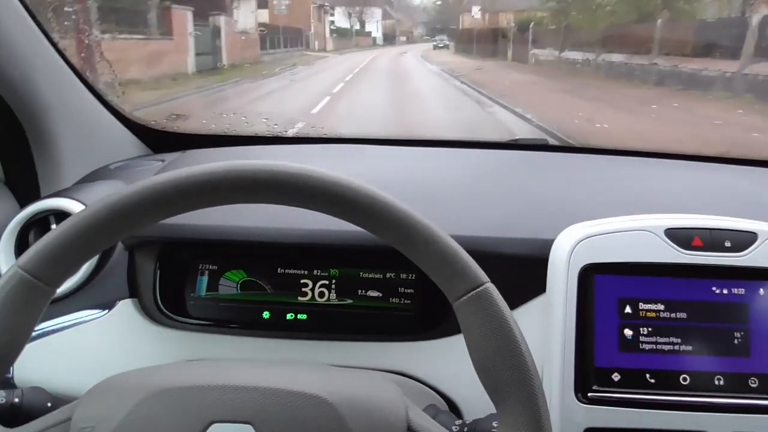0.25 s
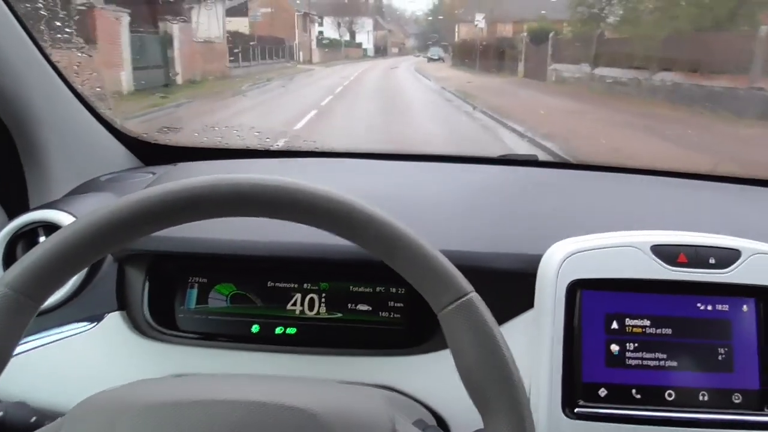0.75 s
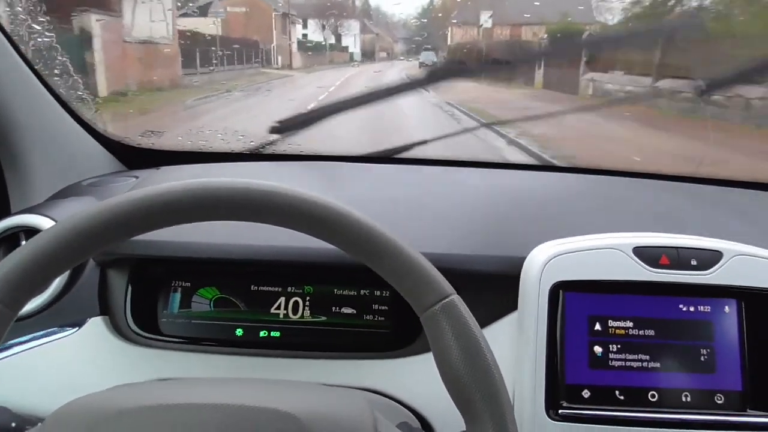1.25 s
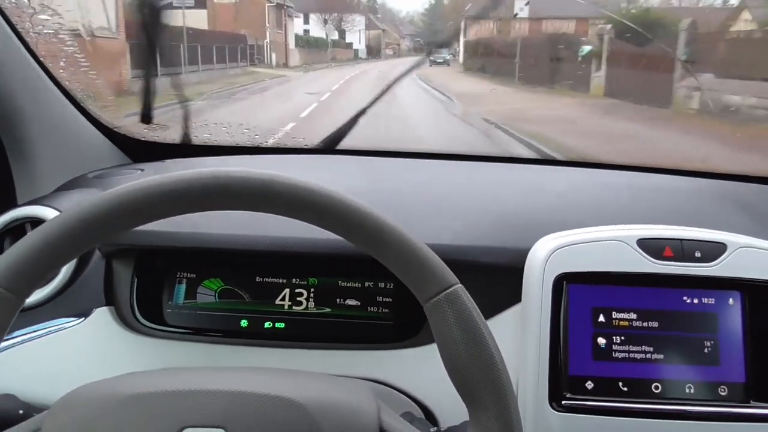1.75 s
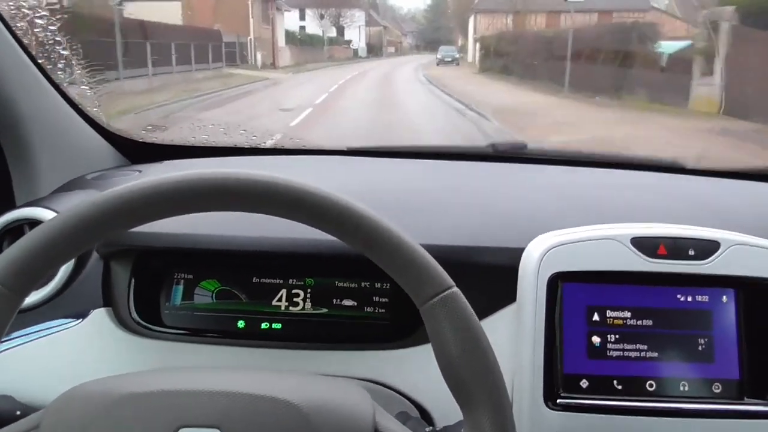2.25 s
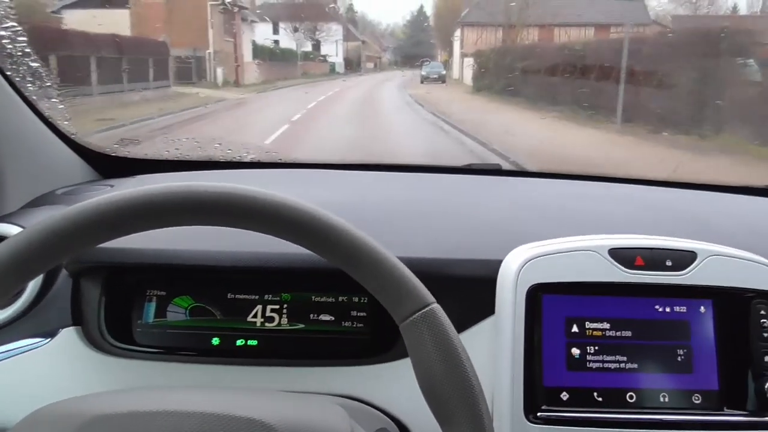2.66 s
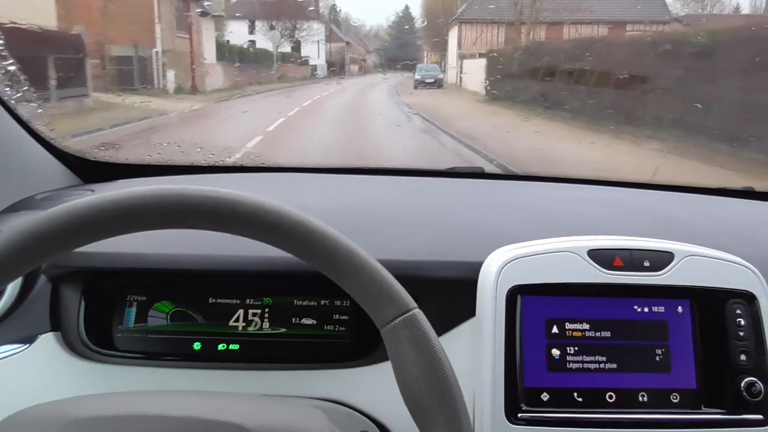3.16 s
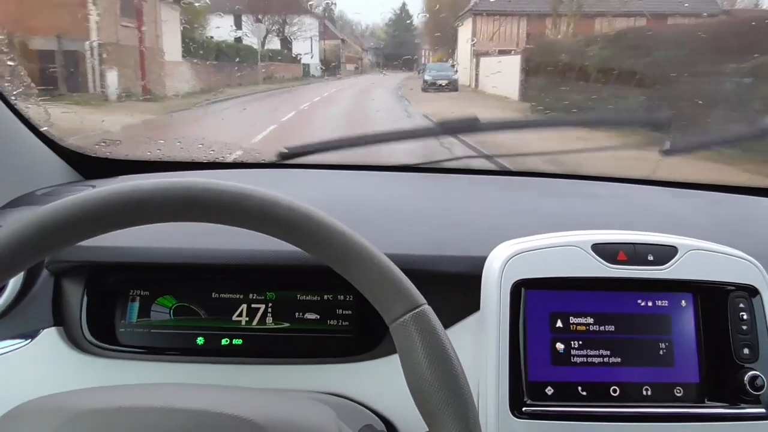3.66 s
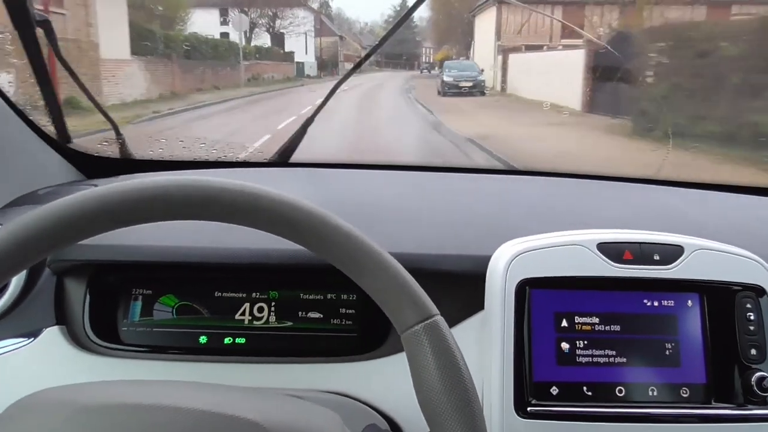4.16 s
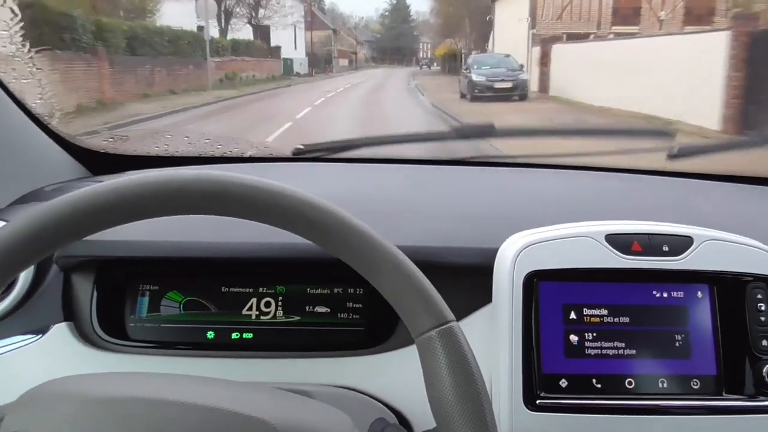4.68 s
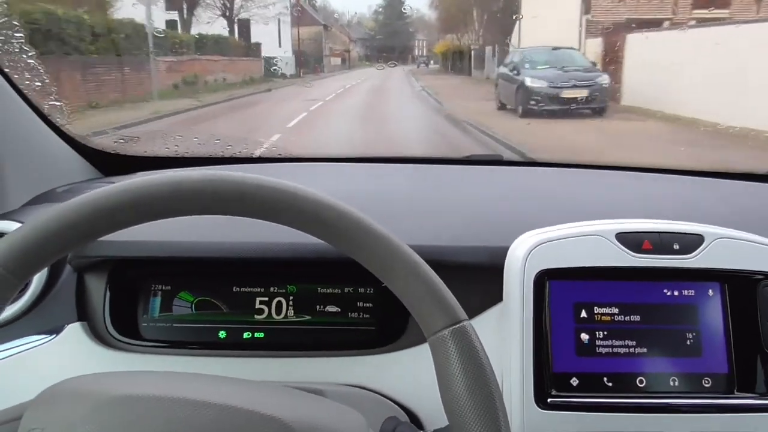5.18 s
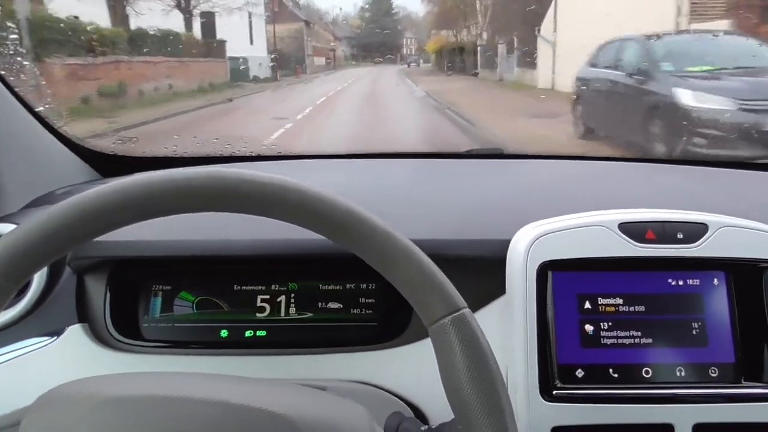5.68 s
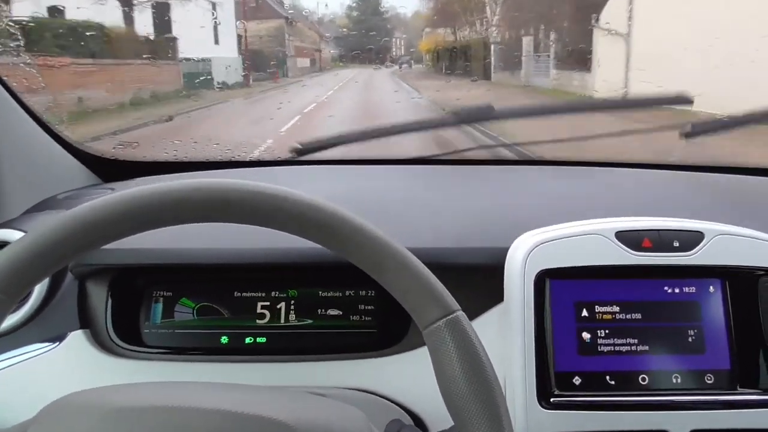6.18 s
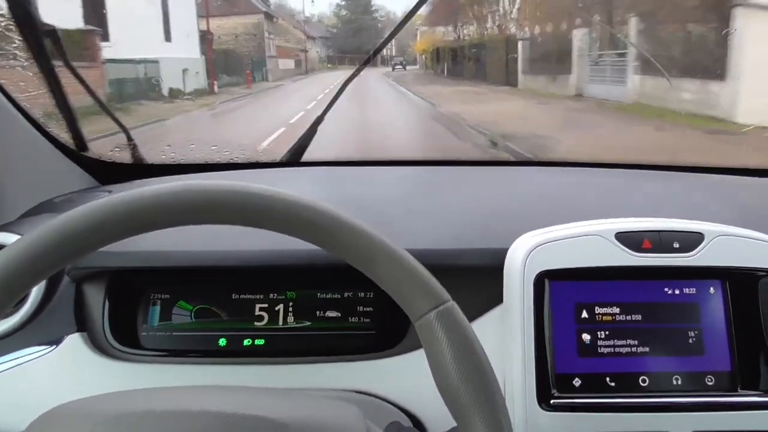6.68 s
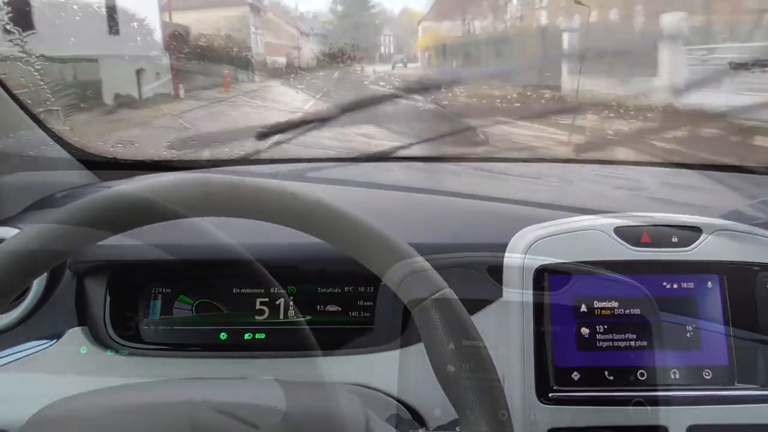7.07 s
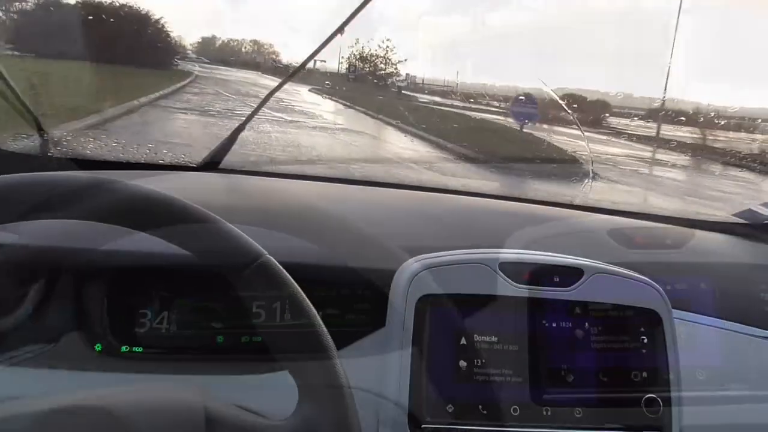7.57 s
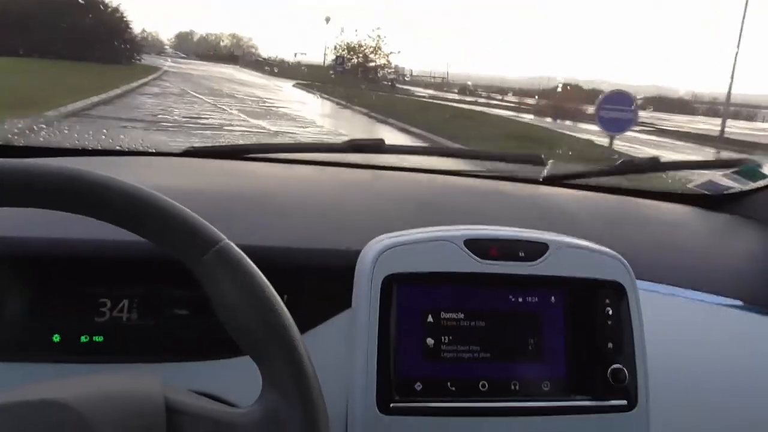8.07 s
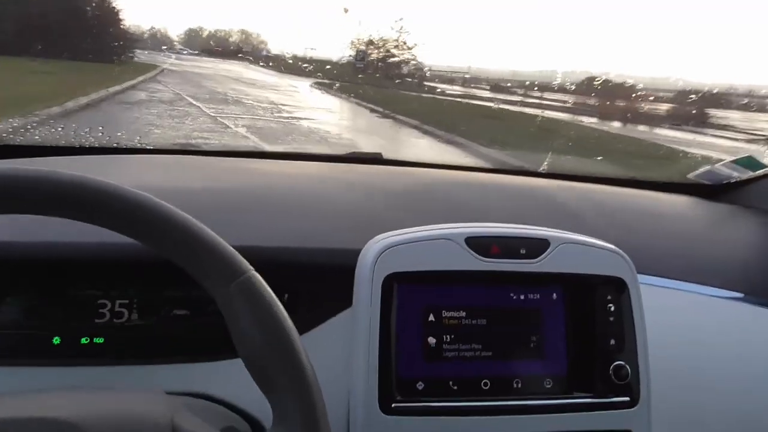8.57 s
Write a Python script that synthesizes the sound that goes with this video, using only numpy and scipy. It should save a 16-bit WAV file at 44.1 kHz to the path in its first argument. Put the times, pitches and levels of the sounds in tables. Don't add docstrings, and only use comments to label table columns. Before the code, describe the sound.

Inside a quiet car driving in rain, microphone by the driver's seat. A steady deep rumble, low boom and muffled tread roar waver with the asphalt, beneath a grainy hiss of spray, ticking drops and faint wind at the seals. It starts fairly smooth and grows wetter from about 1.6 s, with short splats on arches and glass. Wiper arms knock dully near 1.1, 1.8, 3.6 and 4.3 s, then hardest at 6.1 s, with softer rattles around 6.8 s. Rubber chirps are barely audible near 1.7, 4.2, 5.0 and 6.7 s. A strong boom hits at 7.25 s as a slower, rougher road fades in; a tiny high squeak follows at 7.47 s. Heavy booms and coarse tyre growls come at 7.7, 7.9 to 8.1, 8.35 and 8.7 s, with soft wiper knocks at 7.8 and 8.7 s, spray continuing to the end near 8.8 s.

```python
import sys
import numpy as np
from scipy import signal
from scipy.fft import rfft, irfft, next_fast_len
from scipy.io import wavfile
from scipy.ndimage import uniform_filter1d

SR = 44100
rng = np.random.default_rng(int(sys.argv[2]) if len(sys.argv) > 2 else 0)


def boost_factor(decibels):
    exponent = np.asarray(decibels, float) / 20
    return 10 ** exponent


def persist_wave(psi):
    counts = np.round(np.clip(psi, -1, 1) * 32767).astype(np.int16)
    wavfile.write(sys.argv[1], SR, np.atleast_2d(counts).T)


N = 389403


def rolling():
    # f/Hz, density/dB per Hz
    cabin = [(12, -51), (20, -18), (86, -11), (117, -5.5), (135, -8), (253, -9.5), (375, -6), (405, -15),
             (439, -15), (484, -17.5), (589, -26), (823, -30), (1220, -30.5), (1740, -49), (2200, -51),
             (2860, -54), (4840, -120)]
    # f/Hz, width/Hz, lift/dB
    panels = [(136.3, 28, 17), (170, 11.7, 10.5), (224.5, 2.8, 1), (362, 80, -6), (433, 10, 0.5),
              (702, 24, 4), (810, 59, 5), (963, 120, 4.5)]
    hz, both = coloured(*rng.standard_normal((2, N)), cabin)
    for peak_hz, width_hz, lift_db in panels:
        both = both * boost_factor(lift_db / (1 + (2 * (hz - peak_hz) / width_hz) ** 2))
    deep, low, boom, roar = [1 / (1 + (hz / edge_hz) ** 8) for edge_hz in (55, 95, 210, 580)]
    shake_gain, rumble_gain, boom_gain, roar_gain, upper_gain = road()
    grain = boost_factor(0.5 * drift(34))
    out = shake_gain * heard(both * deep)
    out += rumble_gain * evened(heard(both * (low - deep)), span_s=0.08, share=1.0)
    out += boom_gain * evened(heard(both * (boom - low)), span_s=0.067, share=0.99)
    tread = roar_gain * heard(both * (roar - boom))
    tread += upper_gain * heard(both * (1 - roar))
    return out + grain * tread


def road():
    # t/s, v/(km/h)
    speed = [(0, 32.6), (1, 36.7), (2, 44.5), (3.4, 47.3), (4.4, 51.2), (5.8, 46.8), (6.9, 54), (7.6, 41.2),
             (8.83, 51.4)]
    # t/s, level/dB
    roughness = [(0.0, -30.5), (0.42, -33), (1.28, -24.5), (1.72, -28.5), (3.34, -25.5), (4.3, -26.5),
                 (4.92, -27.5), (5.24, -27.5), (6.05, -23.5), (6.69, -26), (6.91, -21), (7.35, -25.5),
                 (7.97, -18.5), (8.83, -24)]
    # t/s, boom/dB, length/s
    ridges = [(0.644, -21, 0.0073), (0.87, -27, 0.027), (1.124, -27, 0.018), (1.222, -23, 0.027),
              (1.34, -26, 0.03), (2.047, -24.5, 0.044), (2.253, -22, 0.039), (2.527, -24.5, 0.046),
              (3.168, -21, 0.048), (3.283, -25, 0.014), (3.438, -20, 0.028), (3.624, -18.5, 0.011),
              (3.77, -25.5, 0.079), (4.015, -26.5, 0.048), (4.353, -31, 0.017), (4.48, -25, 0.026),
              (4.908, -24, 0.1), (5.516, -27, 0.052), (6.138, -24, 0.018), (6.504, -23.5, 0.019),
              (6.716, -24.5, .04), (7.054, -23, 0.014), (7.146, -23, .02), (7.261, -12, 0.0083),
              (7.502, -21.5, .025), (7.797, -29, 0.0094), (7.897, -14.5, 0.02), (7.998, -14, 0.032),
              (8.113, -23, 0.014), (8.351, -14, 0.062)]
    # t/s, rumble/dB, length/s
    rumble_swells = [(0.688, -30, 0.012), (1.125, -23, 0.017), (1.23, -38, .03), (2.322, -36, 0.018),
                     (3.57, -37, 0.05), (4.96, -34, 0.036), (6.47, -32, 0.022), (6.717, -31, 0.022),
                     (7.35, -30, 0.072), (7.687, -33, 0.093), (7.94, -23, 0.013), (8.16, -34, .025),
                     (8.414, -17.5, 0.018), (8.615, -21, 0.04), (8.725, -26, 0.033), (8.79, -20, .015)]
    # t/s, roar/dB, upper roar/dB, length/s
    patches = [
        (1.113, -35, -53, 0.034),
        (1.318, -31.5, -47, .04),
        (6.257, -35, -65, 0.19),
        (7.679, -23.5, -41, 0.031),
        (7.907, -33, -51, 0.024),
        (7.992, -30.5, -42.5, 0.08),
        (8.136, -29.5, -49, 0.017),
        (8.355, -29, -50, 0.083),
        (8.702, -29, -39, 0.04),
    ]
    doublings = np.log2(in_time(speed)[0] / 45)
    rough_db, = in_time(roughness)
    mean_db = rough_db.mean()
    swing_db = rough_db - mean_db
    deep_db = 6.5 * new_road()

    shake = boost_factor(mean_db + 0.55 * swing_db - 21.5 + deep_db)

    s, db, length_s = np.transpose(rumble_swells)
    rumble = boost_factor(mean_db + 0.76 * swing_db - 15.5 + deep_db)
    rumble = np.hypot(rumble, swells(s, boost_factor(db), length_s))

    s, db, length_s = np.transpose(ridges)
    boom = np.hypot(boost_factor(rough_db - 2), swells(s, boost_factor(db), length_s))

    s, roar_db, upper_db, length_s = np.transpose(patches)
    roar = boost_factor(-32 + 7.5 * doublings + 0.093 * swing_db)
    roar = np.hypot(roar, swells(s, boost_factor(roar_db), length_s))
    upper = np.hypot(boost_factor(-45.5 + 8 * doublings), swells(s, boost_factor(upper_db), length_s))
    return shake, rumble, boom, roar, upper


def new_road():
    start_s, fade_s = 7.3, 0.15
    return 1 / (1 + np.exp((start_s - np.arange(N) / SR) / fade_s))


def spray():
    # f/Hz, density/dB per Hz
    water = [(1090, -18), (1850, -12), (2150, -6.5), (2940, -6), (4090, -1.5), (5890, -11), (7500, -5.5),
             (9540, -11.5), (11700, -14), (14200, -23), (15600, -33)]
    # t/s, level/dB
    wetness = [(0.0, -56.5), (0.1, -67), (1.67, -55), (3.37, -54.5), (3.51, -52), (4.6, -53), (4.7, -58),
               (4.84, -52), (5.61, -59.5), (5.68, -53.5), (7.16, -53), (7.38, -53), (7.57, -54),
               (8.83, -51.5)]
    # t/s, change/dB, length/s
    strips = [(.1, 3.5, 0.033), (0.33, 5, 0.097), (0.823, 4.5, 0.068), (1.287, 4, 0.058), (2.11, 5, 0.038),
              (2.22, -2.5, 0.098), (3.25, -6, 0.034), (3.46, -5, 0.01), (4.363, 4, 0.023),
              (4.734, -5, 0.034), (5.019, 9, 0.017), (5.08, -6.5, 0.05), (5.172, 5, .03), (5.3, -1, .04),
              (5.37, 4.5, 0.027), (5.52, 0.5, 0.09), (5.756, 4.5, 0.052), (5.964, 6, 0.0084),
              (5.972, -15, 0.0073), (6.094, 5, 0.024), (6.296, -4.5, 0.043), (6.942, -5.5, .06),
              (7.133, -6, 0.038), (7.43, 4, 0.054), (7.63, -1.5, .05), (7.925, 2.5, 0.07),
              (8.287, -4, 0.08), (8.418, -4.5, 0.02), (8.472, 1.5, 0.051)]
    lumps = slugs(70, spread_db=1.5, decay_s=0.0029)
    drops = slugs(500, spread_db=3.5, decay_s=0.00063)
    gate = 1.1 + 0.45 * lumps + 0.41 * drops
    gate = rms_one(gate * boost_factor(0.48 * drift(25)))
    change_db = swells(*np.transpose(strips))
    spray_db = in_time(wetness)[0] + change_db
    bright_db = -5.5 - 0.13 * change_db + 1.5 * new_road()
    sheet = boost_factor(spray_db + 1.5) * gate
    heavy = splats()

    hz, both = coloured(*rng.standard_normal((2, N)), water)
    dull = 1 / (1 + (hz / 6000) ** 8)
    body = heard(both * dull) * boost_factor(1.3 * drift(60))
    ticks = rms_one(0.5 + 0.24 * slugs(150, spread_db=2.5, decay_s=0.00062))
    fizz = heard(both * (1 - dull)) * boost_factor(bright_db + 0.9 * drift(30)) * ticks
    return np.hypot(sheet, heavy) * body + np.hypot(sheet, boost_factor(-2.5) * heavy) * fizz


def slugs(per_s, spread_db, decay_s):
    sizes = boost_factor(spread_db * np.minimum(rng.exponential(1, N), 3))
    hits = sizes * (rng.random(N) < per_s / SR)
    return rms_one(signal.lfilter([1], [1, -np.exp(-1 / (decay_s * SR))], hits))


def splats():
    # t/s, peak/dB
    big_slugs = [(1.639, -30), (1.809, -27.5), (2.0926, -38), (2.2189, -40), (2.4942, -29.5), (2.7087, -42),
                 (3.267, -32), (3.4216, -44.5), (3.6364, -29), (3.9514, -34), (4.3237, -26), (4.5501, -35),
                 (4.7187, -36), (4.784, -35.5), (5.0828, -34), (5.1133, -35), (5.8735, -35), (5.9898, -31),
                 (6.0257, -31), (6.0576, -31.5), (6.136, -29), (6.2936, -39), (6.595, -32.5),
                 (7.1234, -32.5), (7.3647, -42), (7.4634, -34), (7.5308, -37), (7.9159, -28), (8.4472, -41),
                 (8.5669, -33)]
    s, peak_db = np.transpose(big_slugs)
    hits = np.zeros(N)
    hits[np.round(s * SR).astype(int)] = boost_factor(peak_db - 13.5)
    return signal.lfilter([1], [1, -np.exp(-1 / (0.0099 * SR))], hits)


def wipers():
    # t/s, peak/dB, bulkhead/dB, linkage/dB, arm/dB
    thumps = [(1.084, -28.5, 14.5, -2, -23), (1.113, -24, 10, -16, -22), (1.811, -12.5, 6, -10, -10.5),
              (1.821, -13, -9, -24, -16), (1.832, -21, 4.5, -20, -18), (1.851, -25, 5, -16, -20),
              (3.607, -14.5, 6, -14, -28), (3.632, -15.5, -3, -5, -24), (3.642, -18, 5.5, -11, -24),
              (3.655, -14, -7, -19, -18), (4.323, -12.5, 5, -12, -9.5), (4.334, -19.5, -14, -31, -8),
              (6.116, -22.5, 12, -12, -23), (6.14, -8.5, -7, -10.5, -22), (6.174, -14.5, -4, -22, -28),
              (6.353, -23, -4, -22, -26), (6.753, -35, 3, -5, -17), (6.826, -26, 8, -2, -11),
              (7.82, -29, 3, -14, -23), (8.677, -34, -16, -22, -24), (8.704, -19.5, 5, -15, -9),
              (8.74, -29, -8, -9, -1)]
    # f/Hz, level/dB, t60/s
    parts = [
        [(339, 2, 0.028), (439, -1.5, 0.049)],
        [(187.4, -3, 0.088), (263, -2.5, 0.024)],
        [(640, -5, 0.052), (825, -0.5, 0.039)],
        [(960, 8.5, 0.026), (1227, 3, 0.025), (1586, -4, 0.014)],
    ]
    push_s = 0.011
    out, t = np.zeros(N), np.arange(round(0.25 * SR)) / SR
    pushes = rng.standard_normal((len(thumps), len(t)))
    for push, (s, peak_db, *parts_db) in zip(pushes, thumps):
        push = push * np.exp(-(t / push_s) ** 2)
        push[0] += 45
        knock = 0
        for level_db, modes in zip([0, *parts_db], parts):
            part = 0
            for hz, db, t60 in modes:
                part = part + boost_factor(db) / t60 * ring(ring(push, hz, t60), hz, t60)
            knock = knock + boost_factor(peak_db + level_db - 1.0) * part / np.abs(part).max()
        at = round((s - 0.002) * SR)
        out[at:at + len(t)] += knock[:N - at]
    return signal.sosfilt(signal.butter(2, 110, "high", fs=SR, output="sos"), out)


def ring(x, hz, t60):
    r, w = boost_factor(-60 / (t60 * SR)), 2 * np.pi * hz / SR
    return signal.lfilter([0, np.sin(w)], [1, -2 * r * np.cos(w), r * r], x + 1e-18)


def squeaks():
    # t/s, peak/dB, f/Hz, waver/Hz, length/s
    notes_sung = [
        (1.663, -53, 2070, 170, .025),
        (4.2, -51, 2160, 220, 0.022),
        (5.014, -46, 2120, 250, 0.0069),
        (6.7, -51, 2170, 220, 0.021),
        (7.453, -40, 4650, 40, .002),
        (7.4575, -34, 4830, 40, .0016),
        (7.4657, -24.5, 4640, 69.5, 0.0019),
        (7.469, -37, 4770, 40, 0.0025),
        (7.482, -46, 4740, 40, 0.0037),
        (7.535, -49, 2080, 199, .005),
    ]
    t, waver, out = np.arange(N) / SR, drift(165), np.zeros(N)
    for s, peak_db, hz, waver_hz, length_s in notes_sung:
        near = slice(round((s - 0.1) * SR), round((s + 0.1) * SR))
        phase = 2 * np.pi * np.cumsum(hz + waver_hz * waver[near]) / SR
        note = np.sin(phase) + boost_factor(-26) * np.sin(2 * phase)
        out[near] += boost_factor(peak_db) * note * np.exp(-0.5 * ((t[near] - s) / length_s) ** 2)
    return out


def wind():
    # f/Hz, density/dB per Hz
    seals = [(880, -17), (1500, 10.5), (1750, -7), (4030, -3.5), (6020, -29), (7770, -19), (9540, -28),
             (12900, -12), (15600, -26)]
    _, both = coloured(*rng.standard_normal((2, N)), seals)
    return boost_factor(-62.5) * heard(both)


def coloured(mid, side, spectrum):
    # f/Hz, side minus mid/dB
    width = [(25, -28), (60, -25), (130, -26), (250, -14.5), (500, -13.5), (1100, -5), (2200, -6),
             (4400, -9), (6000, -8.5), (7800, -1.5), (11000, 2), (15000, -7)]
    # f/Hz, left minus right/dB
    lean_db = [(60, -2), (130, 0.47), (300, -0.8), (1000, -2.7), (2200, 1.5), (4000, -1), (8000, 0.6),
               (12000, -2), (15000, -6)]
    size = next_fast_len(N)
    hz = np.arange(size // 2 + 1) * SR / size
    mid = rfft(mid, size)
    side = rfft(side, size) * boost_factor(at_hz(width, hz))
    lean = boost_factor(at_hz(lean_db, hz) / 2)
    return hz, boost_factor(at_hz(spectrum, hz)) * np.array([(mid + side) * lean, (mid - side) / lean])


def heard(spectrum):
    x = irfft(spectrum, next_fast_len(N))[:, :N]
    return x / np.sqrt(np.mean(x.mean(axis=0) ** 2))


def evened(x, span_s, share):
    power = uniform_filter1d(x.mean(axis=0) ** 2, round(span_s * SR))
    return x * (power + 0.042) ** (-share / 2)


def swells(s, size, length_s):
    t = np.arange(0, N + 40, 40) / SR
    bells = size @ np.exp(-0.5 * ((t - s[:, None]) / np.maximum(length_s, 0.004)[:, None]) ** 2)
    return np.interp(np.arange(N) / SR, t, bells)


def drift(rate_hz):
    r = np.exp(-2 * np.pi * rate_hz / SR)
    noise = rng.standard_normal(N + SR)
    return rms_one(signal.lfilter([1], [1, -2 * r, r * r], noise)[SR:])


def rms_one(x):
    return x / np.sqrt(np.mean(x ** 2) + 1e-20)


def in_time(rows):
    s, *columns = np.transpose(rows)
    return [np.interp(np.arange(N) / SR, s, c) for c in columns]


def at_hz(points, hz):
    point_hz, db = np.transpose(points)
    return np.interp(np.log(hz + 1), np.log(point_hz), db)


def scene():
    out = rolling() + spray() + wind()
    out += wipers() * boost_factor(np.array([[-0.2], [0.2]]))
    return out + squeaks() * boost_factor(np.array([[0.3], [-0.3]]))


def low_pass(x):
    return signal.sosfilt(signal.butter(12, 15720, fs=SR, output="sos"), x)


def record(dry):
    top = signal.cheby2(12, 50, 16400, fs=SR, output="sos")
    mix = signal.sosfilt(top, dry)
    return low_pass(mix)


dry = scene()
out = record(dry)
persist_wave(out)
```